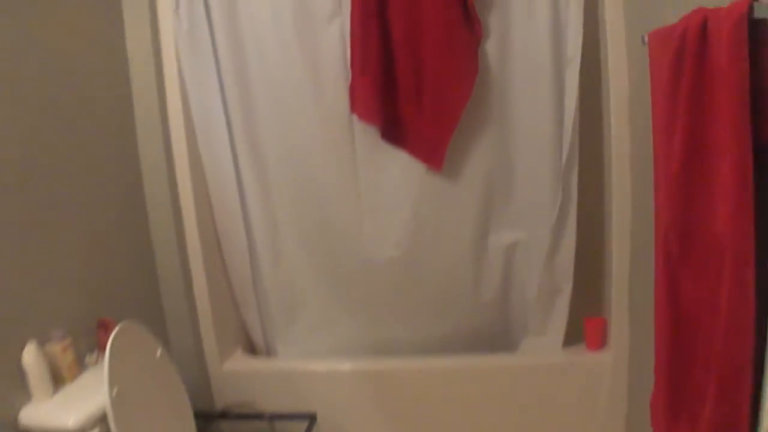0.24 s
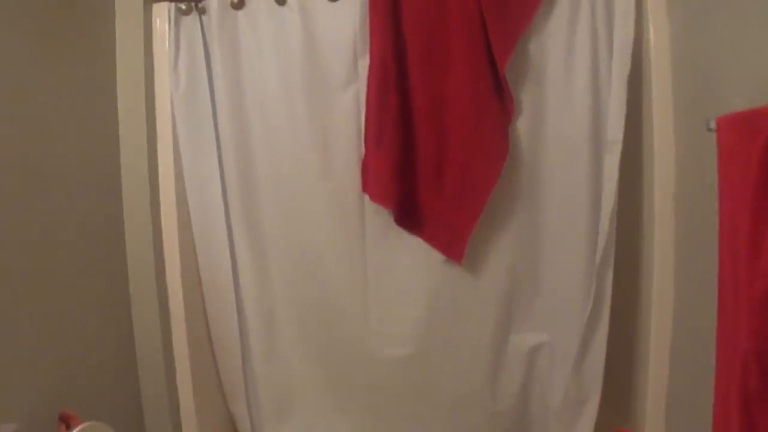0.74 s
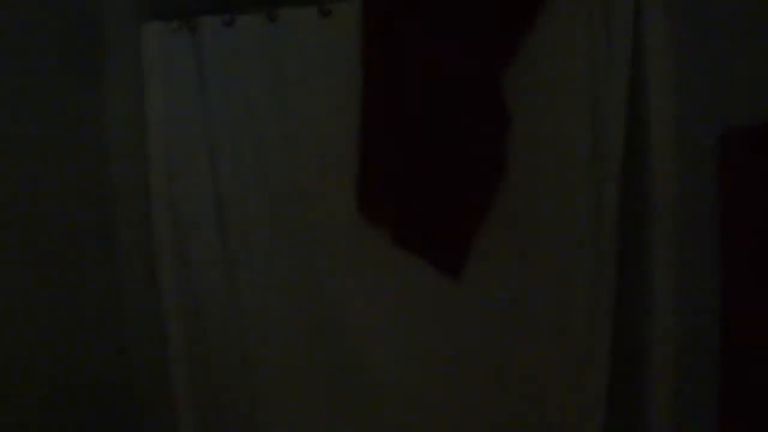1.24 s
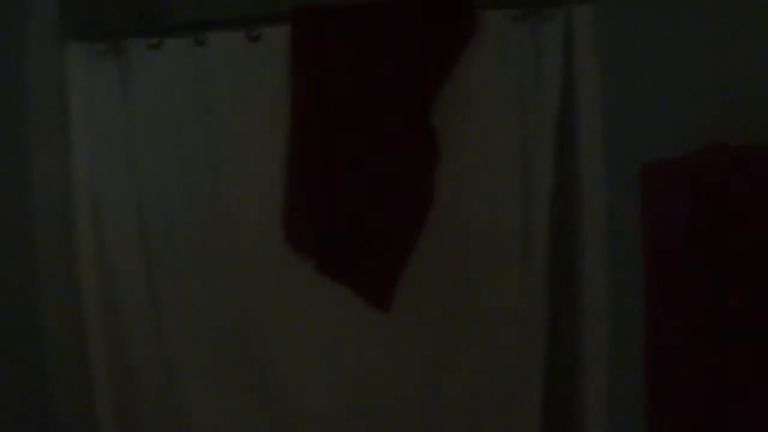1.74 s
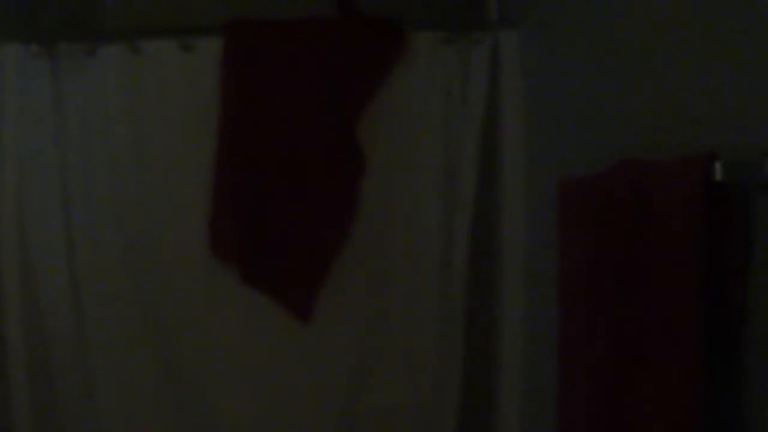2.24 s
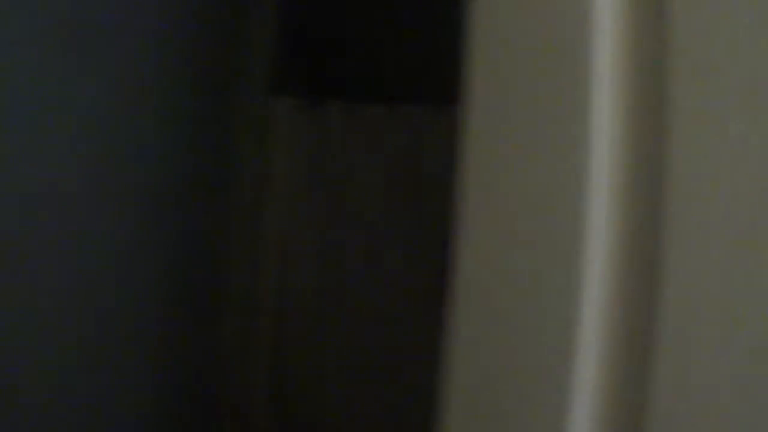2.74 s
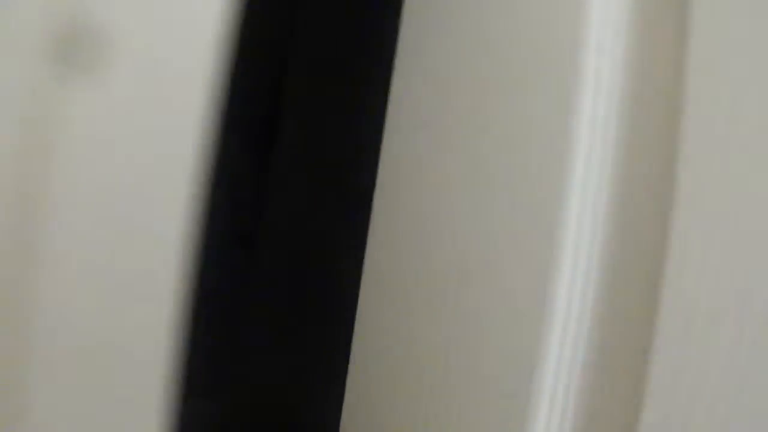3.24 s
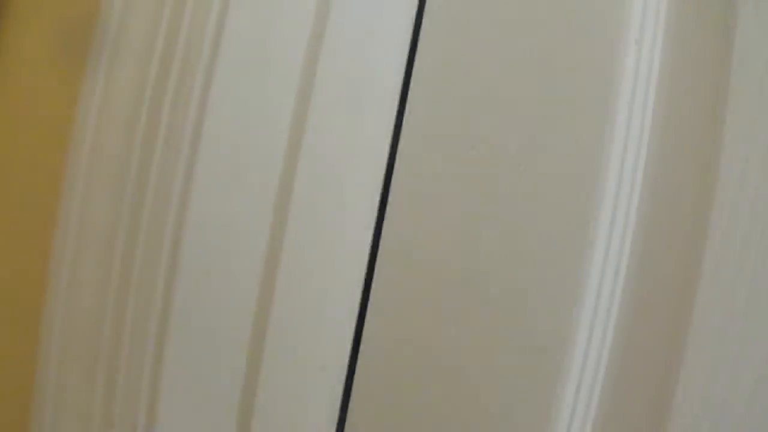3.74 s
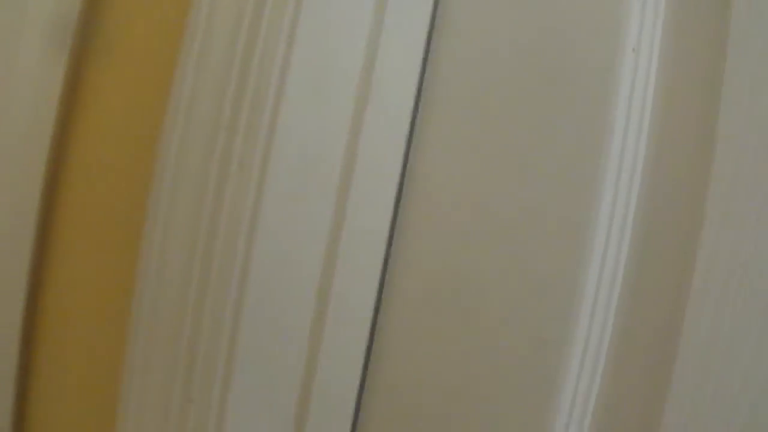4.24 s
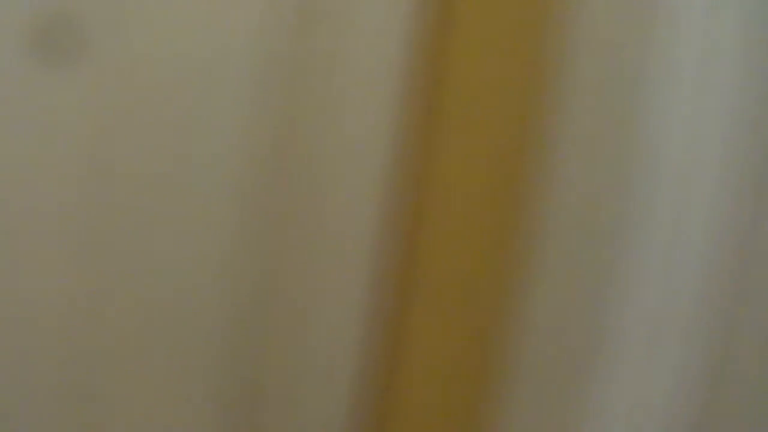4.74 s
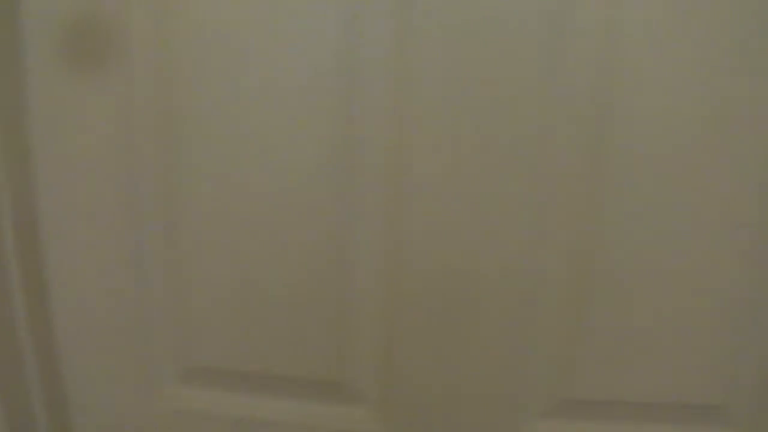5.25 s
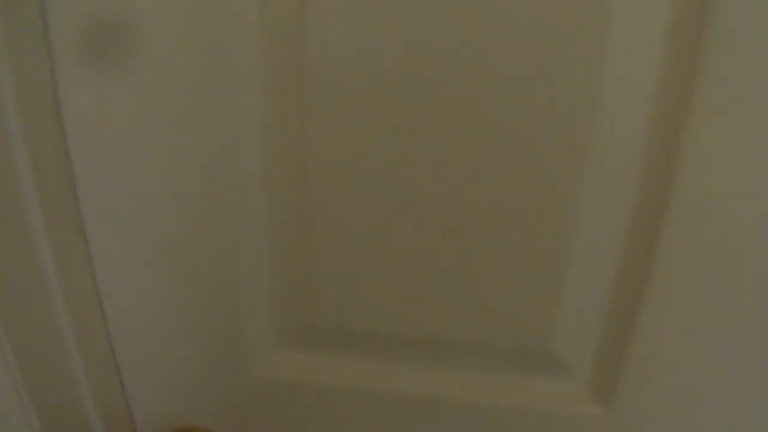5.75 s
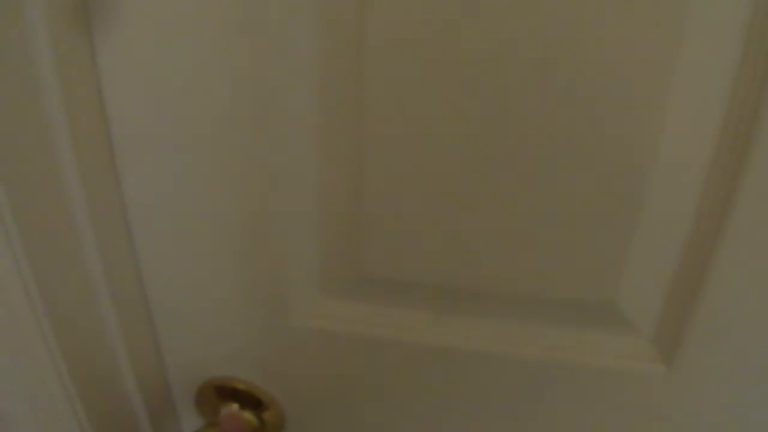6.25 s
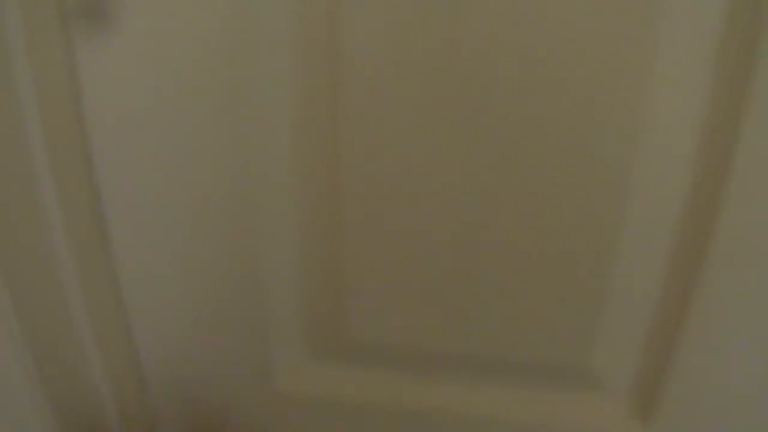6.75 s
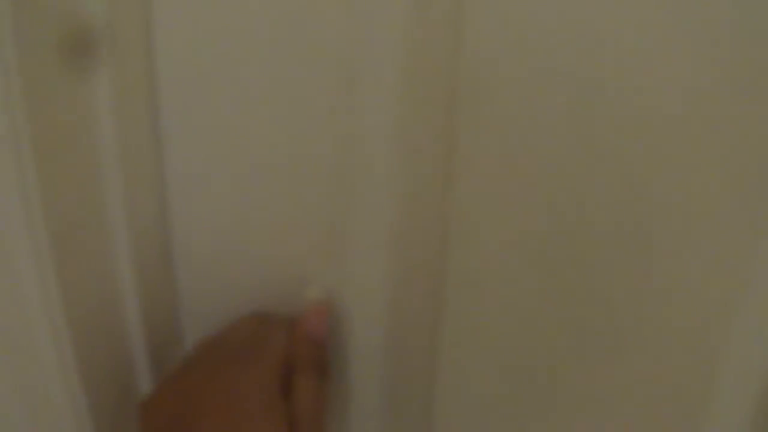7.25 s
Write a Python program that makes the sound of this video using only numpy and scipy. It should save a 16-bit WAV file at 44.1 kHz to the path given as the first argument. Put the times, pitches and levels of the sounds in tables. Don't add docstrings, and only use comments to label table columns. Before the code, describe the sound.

Bright switch click and metallic knob clatter in a bathroom, then a door closing, dry latch clicks in a hallway and three knuckle knocks on hollow wood.

```python
import sys
import numpy as np
from scipy import signal
from scipy.fft import rfft, irfft, next_fast_len
from scipy.io import wavfile
from scipy.ndimage import map_coordinates

SR = 44100
rng = np.random.default_rng(int(sys.argv[2]) if len(sys.argv) > 2 else 0)


def put_to_file(sound):
    columns = np.atleast_2d(sound).T
    safe = np.clip(columns, -1, 1)
    whole_steps = np.round(safe * 32767)
    wavfile.write(sys.argv[1], SR, whole_steps.astype(np.int16))


def attenuation_scalar(level_db):
    decades = np.asarray(level_db, float) / 20
    return 10 ** decades


N = 330750

# band_hz, t60_s
HALL_DECAY = [(200, 0.4), (600, 0.33), (1500, 0.12), (4000, 0.05), (10000, 0.055)]


def along(points, hz):
    f, v = np.transpose(points)
    return np.interp(np.log(hz + 1), np.log(f + 1), v)


def unit(x):
    return x / np.sqrt(np.mean(x ** 2) + 1e-20)


def filtered(x, response):
    m = next_fast_len(len(x) + SR // 4)
    hz = np.fft.rfftfreq(m, 1 / SR)
    return irfft(rfft(x, m) * response(hz), m)[:len(x)]


def resonant(peaks):
    def response(f):
        total = 0
        for k, (centre, width, db) in enumerate(peaks):
            damping = 1j * f * width
            total = total + (-1) ** k * attenuation_scalar(db) * damping / (centre * centre - f * f + damping)
        return total
    return response


def add(track, s, sound):
    part = track[round(s * SR):][:len(sound)]
    part += sound[:len(part)]


def wobble(rate, size=N):
    knots = rng.standard_normal(int(size * rate / SR) + 4)
    return map_coordinates(knots, [np.arange(size) * rate / SR])


def tail(walls, build_s):
    hz, t, z = signal.stft(rng.standard_normal(SR // 2), SR, nperseg=256)
    t60 = np.maximum(along(walls, hz), .03)[:, None]
    answer = signal.istft(z * attenuation_scalar(-60 * t / t60), SR, nperseg=256)[1]
    answer = answer * (1 - np.exp(-np.arange(len(answer)) / SR / build_s))
    return answer / np.linalg.norm(answer)


def contacts(rows, walls, rise_s, t60, blow, room_db, low_hz):
    # centre_hz, width_hz, level_db
    plate = [(1930, 1470, 0)]
    leaf = [(322, 125, -1), (522, 150, 0), (780, 200, 2.5), (1054, 524, -4.5)]
    bolt_spring = [(3500, 3400, 0)]
    edge_crack = [(6330, 17000, 0)]
    # centre_hz, width_hz, level_db
    latch_modes = [(1520, 130, -3), (2050, 140, 0), (2800, 150, -3), (3300, 180, -2), (3640, 120, -2),
                   (4250, 300, 0)]
    modes_db, bolt_most_db = -5, 9.5
    crack_db, crack_room_db = -7, -3

    out, t = np.zeros(N), np.arange(SR // 8) / SR
    m = next_fast_len(SR // 2 + SR // 8)
    hz = np.fft.rfftfreq(m, 1 / SR)
    parts = np.array([resonant(plate)(hz) ** 3, resonant(leaf)(hz),
                      -resonant(bolt_spring)(hz) ** 3, resonant(edge_crack)(hz) ** 3])
    parts *= (1j * hz / (low_hz + 1j * hz)) ** 2
    parts[::2] *= 1 + attenuation_scalar(modes_db) * resonant(latch_modes)(hz)
    parts[1] /= 1 + 1j * hz / 1800
    room_gain = attenuation_scalar(room_db + crack_room_db * np.array([0, 0, 0, 1]))

    for s, db, wood_db, bright_db in rows:
        spikes, unevenness = rng.standard_normal((2, len(t)))
        force = spikes * attenuation_scalar(3.5 * unevenness - 60 * t / t60)
        force *= 1 - np.exp(-(t + 1 / SR) / rise_s)
        force[0] += blow
        direct = irfft(rfft(force, m) * parts, m)
        echo = irfft(rfft(tail(walls, .003 + rise_s), m) * parts, m)
        part_db = np.array([0, wood_db, min(bright_db, bolt_most_db), bright_db + crack_db])
        gain = attenuation_scalar(db + part_db) / np.abs(direct).max(axis=1)
        share = room_gain * np.linalg.norm(direct, axis=1) / np.linalg.norm(echo, axis=1)
        add(out, s, gain @ direct + (gain * share) @ echo)
    return out


def rattles(snaps):
    delay_s, dull_db = 0.006, -7
    blows, after = [], []
    for s, db, wood_db, bright_db, after_db in snaps:
        blows.append((s, db, wood_db, bright_db))
        after.append((s + delay_s, db + after_db, wood_db, bright_db + dull_db))
    return blows, after


def motion(latch):
    # time_s, level_db
    rustle_course = [(0.0, -41.5), (0.44, -47.5), (0.81, -53), (1.2, -61), (1.84, -46), (2.17, -43.5),
                     (2.5, -51.5), (2.8, -39.5), (3.15, -36.5), (3.53, -46), (4.0, -45), (4.16, -44),
                     (4.51, -45.5), (5.08, -43), (5.54, -42.5), (6.0, -46.5), (6.9, -49), (7.5, -44.5)]
    # freq_hz, density_db
    rustle_colour = [(59, -28), (100, -16.5), (290, -9.5), (368, -4), (536, -14), (927, -12.5), (1420, -14),
                     (7000, -33.5)]
    # centre_s, peak_db
    jolts = [(0.25, -60), (0.94, -66.5), (1.27, -65), (1.43, -58), (1.93, -66), (2.29, -62), (2.45, -58),
             (2.6, -62), (2.71, -59), (2.98, -59), (3.65, -57), (3.85, -66), (3.99, -54), (4.16, -56),
             (4.51, -61), (4.66, -59), (4.99, -64), (5.17, -59), (5.68, -58), (5.95, -64), (6.37, -59),
             (6.52, -60), (6.7, -53), (6.89, -60), (7.06, -62), (7.23, -53), (7.42, -45)]
    jolt_s, jolt_hz, tremor_db = 0.038, 56, -76.5
    shiver_db, shiver_t60, shiver_low_hz = -13.5, 0.6, 400

    t = np.arange(N) / SR
    s, rustle_db = np.transpose(rustle_course)
    cloth = unit(filtered(rng.standard_normal(N), lambda hz: attenuation_scalar(along(rustle_colour, hz))))
    fade = attenuation_scalar(-120 * t[:SR // 2] / shiver_t60)
    power = signal.fftconvolve(latch ** 2, fade / fade.sum())[:N]
    shiver = attenuation_scalar(shiver_db) * np.sqrt(np.abs(power))
    loose = filtered(cloth, lambda hz: (hz / (hz + shiver_low_hz)) ** 2)
    rustle = attenuation_scalar(np.interp(t, s, rustle_db) - 10.0) * cloth + shiver * loose
    rustle = rustle * attenuation_scalar(1.85 * wobble(9.9))

    sway = 1.2 * wobble(25)
    grip = np.zeros(N)
    for centre_s, db in jolts:
        since = t - centre_s
        grip += attenuation_scalar(db + 1.5) * np.exp(-(since / jolt_s) ** 2) * np.sin(2 * np.pi * jolt_hz * since + sway)
    shake = unit(filtered(rng.standard_normal(N), lambda hz: resonant([(52, 40, 0)])(hz) ** 2))
    return rustle + grip + attenuation_scalar(tremor_db + 2.6 * wobble(12)) * shake


def bathroom_contacts():
    hard_contacts = [
        (0.3922, -58, -10, 7, -22),
        (0.8877, -10.5, -24, -3.5, -23),
        (0.9198, -23, -23.5, 14, -7),
        (1.1604, -56, -8, 13, -20),
        (1.28, -34.5, -13, -2.5, -23),
        (1.3023, -19.5, -6, -7.5, -3.5),
        (1.4331, -19, -8.5, -38, -12),
        (2.0165, -22.5, 0, 9, 1),
        (2.2532, -57, 7, 7, -10),
        (2.8423, -46.5, 17, 24.5, -8),
    ]
    # wood_db, brightness_db
    sliding = [(0.0024, -52.5, 16, -19), (0.3225, -46, 9, -8), (0.9405, -43, -29, -6),
               (1.4246, -28, -21, 0.5), (2.01, -28, -2, 5), (2.7678, -46, -21, 3.5), (2.9057, -32.5, 2, -1),
               (2.9169, -28.5, 2, -2.5), (2.9286, -30, 6, -1), (3.059, -48, 2, -5), (3.11, -45.5, 9.5, -6),
               (3.1882, -43, 5.5, -8), (3.24, -43, 5, 2)]
    # band_hz, t60_s
    tiles = [(200, 0.35), (600, 0.42), (1500, 0.34), (4000, 0.36), (10000, 0.28)]
    blows, after = rattles(hard_contacts)
    snaps = contacts(blows, tiles, 0.000067, 0.028, blow=4, room_db=4, low_hz=350)
    rubs = contacts(after + sliding, tiles, 0.0035, 0.048, blow=0, room_db=1.4, low_hz=248)
    return snaps + rubs


def thuds():
    # start_s, peak_db, pitch_hz
    floor_pushes = [(0.325, -39.5, 144), (0.325, -36, 224), (2.389, -55, 89), (2.497, -49.5, 130),
                    (2.626, -32, 116), (2.708, -31, 110), (4.763, -35.5, 150), (6.07, -46.5, 158),
                    (6.213, -47.5, 166.6), (6.513, -26, 159), (7.045, -38, 91), (7.247, -42, 91.5)]
    # start_s, peak_db
    door_pushes = [(2.021, -28), (2.402, -58), (2.844, -42), (2.92, -37), (3.262, -21), (4.066, -48),
                   (4.427, -44), (5.832, -30.5), (5.898, -35), (6.598, -28), (6.7, -26.5)]
    door_hz = 191.2
    out, t = np.zeros(N), np.arange(SR // 3) / SR
    pushes = [(s, db, door_hz) for s, db in door_pushes] + list(floor_pushes)
    for s, db, hz in pushes:
        t60 = np.interp(db, [-36.5, -35], [0.28, 0.093])
        body = np.sin(2 * np.pi * hz * t) + .5 * np.sin(2 * np.pi * 1.37 * hz * t)
        add(out, s, attenuation_scalar(db - 60 * t / t60) * body * (1 - np.exp(-t / 0.0071)))
    return out


def knob():
    # start_s, peak_db, upper_modes_db re lower, hand_damping (about 1 free - 4 held)
    strikes = [
        (2.0173, -34, -2, 0.9),
        (4.77, -37, -4.5, 1.74),
        (6.68, -45, -6, 4),
    ]
    # mode_hz, level_db, t60_s
    shell_modes = [(8720, 7, 0.28), (8640, 1, 0.33), (8900, 1, .15), (9950, 7, 0.25), (9820, 2, 0.26),
                   (10080, -2, 0.18)]
    out, t = np.zeros(N), np.arange(SR // 2) / SR
    for s, db, upper_db, damping in strikes:
        for hz, level_db, t60 in shell_modes:
            waver, drift = wobble(54, size=len(t)), wobble(71, size=len(t))
            mode_db = db - 8.5 + level_db + upper_db * (hz > 9400)
            size = attenuation_scalar(mode_db + 4 * waver - 60 * t * damping / t60)
            onset = 1 - np.exp(-t / 0.00051)
            add(out, s, size * np.sin(2 * np.pi * hz * t + 3.7 * drift) * onset)
    return out + attenuation_scalar(5) * signal.fftconvolve(out, tail(HALL_DECAY, 0.0047))[:N]


def hall_contacts():
    hard_contacts = [(2.6266, -39.5, -1, -20, -29), (3.2625, -36, 16, -12, -5.5),
                     (3.2724, -30, 8.5, 6.5, -3), (4.0677, -43.5, 12, 1, -6), (4.133, -40, 8.5, -9, -30),
                     (4.2977, -26, -3, -0.5, -15), (4.343, -18, -3.5, -3, -11), (4.4879, -40, 2, 5.5, -20),
                     (4.5935, -32, 12, -2, -2), (4.7547, -29, -1.5, 0.5, 11),
                     (4.7874, -18.5, 0.5, -3, -7.5), (5.1815, -39, -21, -2.5, -14),
                     (5.8354, -25, -2.5, -0.5, -8), (5.9813, -48.5, 7, 7, -20),
                     (5.9983, -32.5, -6, 1.5, -16), (6.2153, -27.5, -2, 16, -15.5), (6.5148, -20, 7, 0, -6),
                     (6.5274, -17, -0.5, -0.5, -28), (6.5859, -27.5, -3, -7, -23),
                     (6.6749, -31, 1, 6.5, -4)]
    bolt_ticks = [
        (7.0414, -38, -28, 5.5, -35),
        (7.0575, -47.5, -20, 30, -30),
        (7.2447, -35, -36, -19, -30),
    ]
    # wood_db, brightness_db
    sliding = [(4.1994, -58, 17, -11), (4.281, -47, 10, 1), (4.3183, -52, 26, 9), (4.4494, -58, 1, -5),
               (5.8, -49.5, 11, -6), (5.882, -39, 7, -2), (6.0608, -43.5, 5.5, -7), (6.491, -33, 2, -7),
               (6.6284, -39, 3, 0), (6.7266, -44, 14, 0)]
    blows, after = rattles(list(hard_contacts) + list(bolt_ticks))
    snaps = contacts(blows, HALL_DECAY, .0003, .032, blow=16, room_db=-2.5, low_hz=180)
    rubs = contacts(sliding, HALL_DECAY, .006, .09, blow=0, room_db=-6, low_hz=160)
    loose = contacts(after, HALL_DECAY, 0.0013, 0.13, blow=0, room_db=-6.5, low_hz=171)
    return snaps + rubs + loose


def knocks():
    # start_s, peak_db, hardness_db
    knuckle = [
        (7.041, -16, 4.5),
        (7.246, -18, 1),
        (7.425, -22, -30),
    ]
    # mode_hz, level_db, t60_s
    panel_modes = [(148.6, -15.5, 0.98), (196, 6, 0.37), (240, 1, 0.59), (278, 0.5, 0.53),
                   (321.3, -1, 0.23), (348, -7, 0.57), (388, 2, 0.39), (410, 5.5, 0.16), (479, 0, 0.39),
                   (616, -33, .25), (807, -5.5, 0.42), (835, -8, 0.25), (915, -5.5, 0.13), (1400, -15, 0.2)]
    t = np.arange(SR // 2) / SR
    late = t - .002

    def uneven():
        return wobble(30, size=len(t)) * np.minimum(t / .02, 1)

    ring = np.zeros(len(t))
    for hz, level_db, t60 in panel_modes:
        size = attenuation_scalar(level_db + 2.9 * uneven() - 60 * t / t60)
        ring -= size * np.cos(2 * np.pi * hz * late + 0.86 * uneven())
    ring = attenuation_scalar(-11) * ring * (1 - np.exp(-(t / 0.0022) ** 2))

    push = -np.exp(-(late / .0016) ** 2) * np.cos(2 * np.pi * 450 * late)
    bone = np.cos(2 * np.pi * 1300 * late) + .4 * np.cos(2 * np.pi * 2250 * late)
    hard = -np.exp(-(late / .0011) ** 2) * bone
    echo = tail([(200, 0.43), (800, 0.35), (1500, 0.086), (3000, 0.06)], 0.0023)
    out = np.zeros(N)
    for s, db, hard_db in knuckle:
        blow = attenuation_scalar(7.0) * push + attenuation_scalar(hard_db - 6.0) * hard
        reflected = attenuation_scalar(-10.5) * signal.fftconvolve(blow, echo)[:len(t)]
        add(out, s, attenuation_scalar(db) * (blow + ring + reflected))
    return out


def scene():
    latch = bathroom_contacts() + hall_contacts()
    return (motion(latch) + latch + thuds() + knob() + knocks())[None]


def low_pass(x):
    return signal.sosfilt(signal.butter(12, 10950, fs=SR, output="sos"), x)


def record(dry):
    # freq_hz, density_db
    hiss_colour = [(35, -38), (60, -28.5), (170, 0.5), (313, -4.5), (500, 0.5), (1000, -4), (2690, -8.5),
                   (10800, -17)]
    hiss_db, top_hz = -53, 10960
    hiss = unit(filtered(rng.standard_normal(N), lambda hz: attenuation_scalar(along(hiss_colour, hz))))
    x = dry[0] + attenuation_scalar(hiss_db) * hiss
    x = filtered(x, lambda hz: 1 / (1 + (hz / top_hz) ** 150))
    return low_pass(x[None])


dry = scene()
out = record(dry)
put_to_file(out)
```